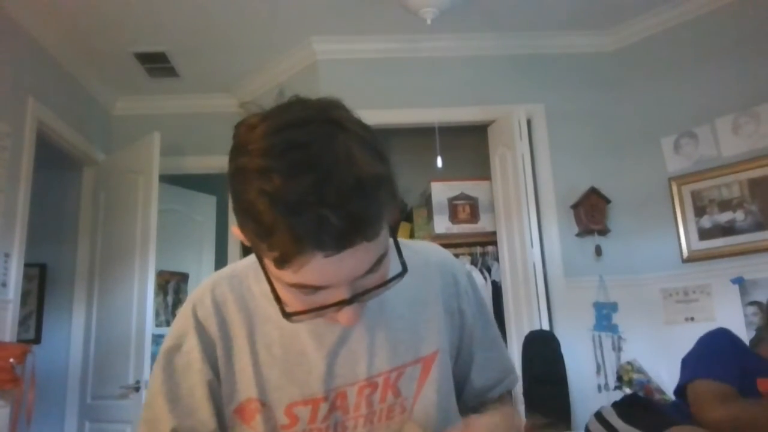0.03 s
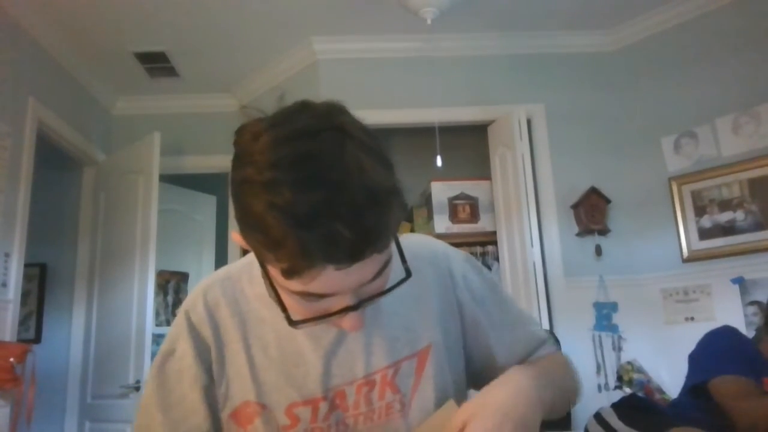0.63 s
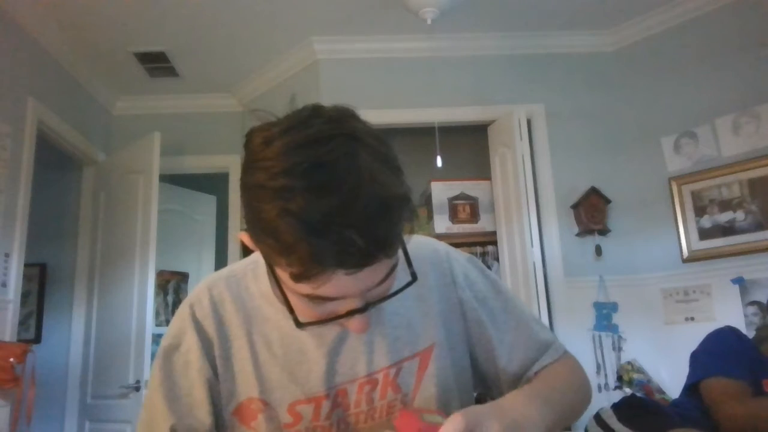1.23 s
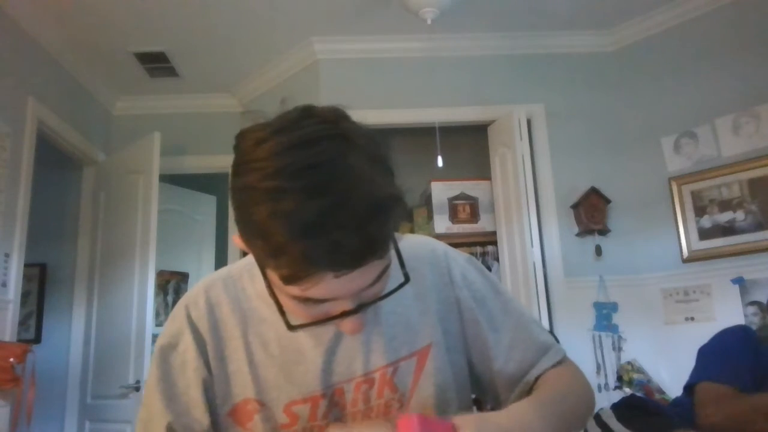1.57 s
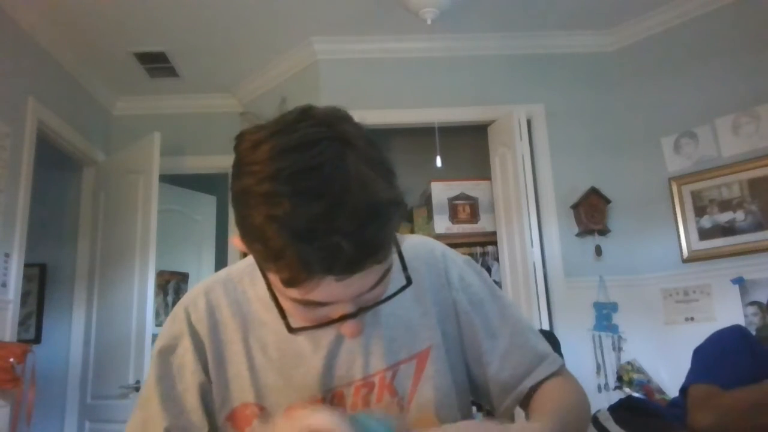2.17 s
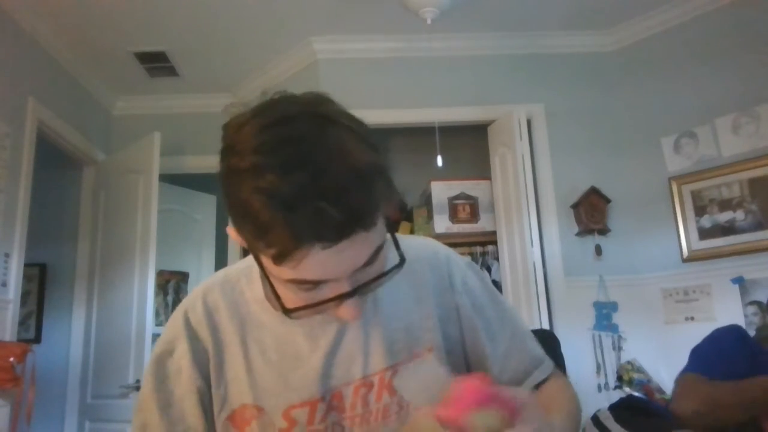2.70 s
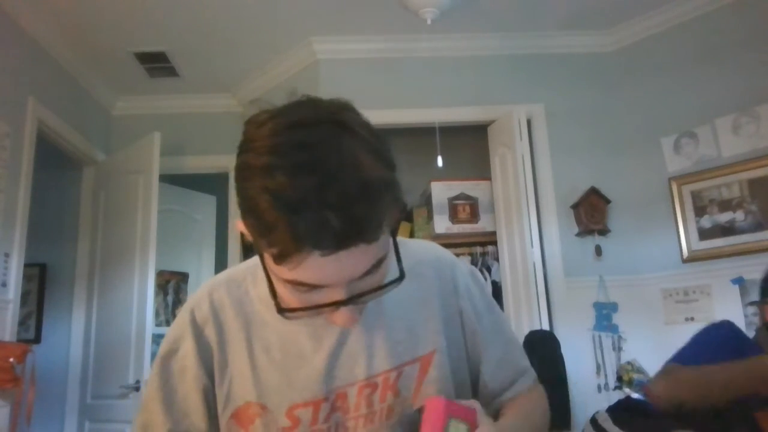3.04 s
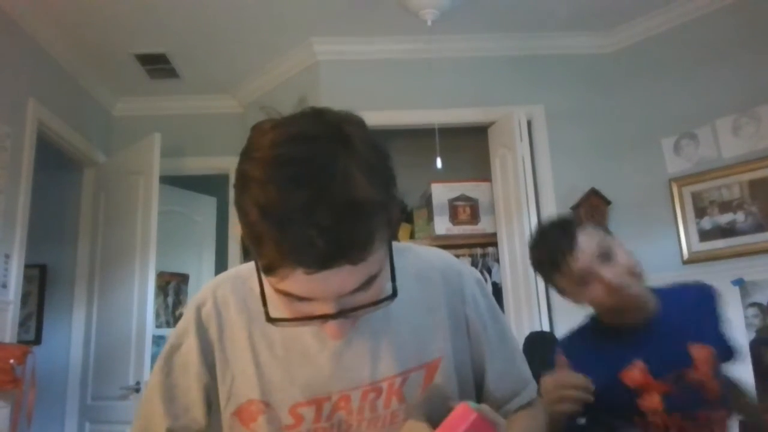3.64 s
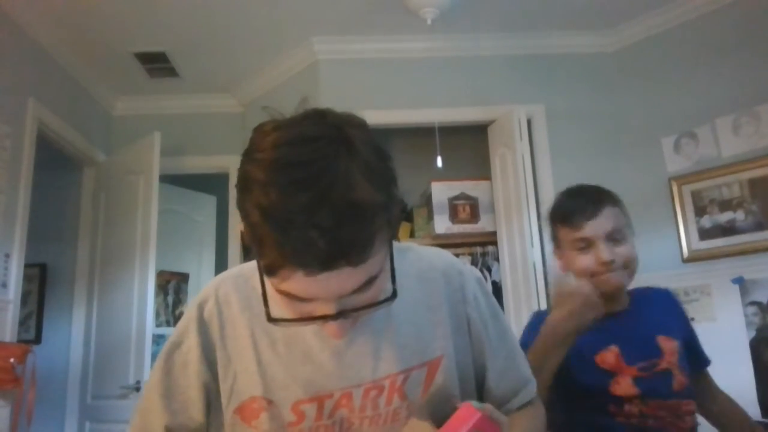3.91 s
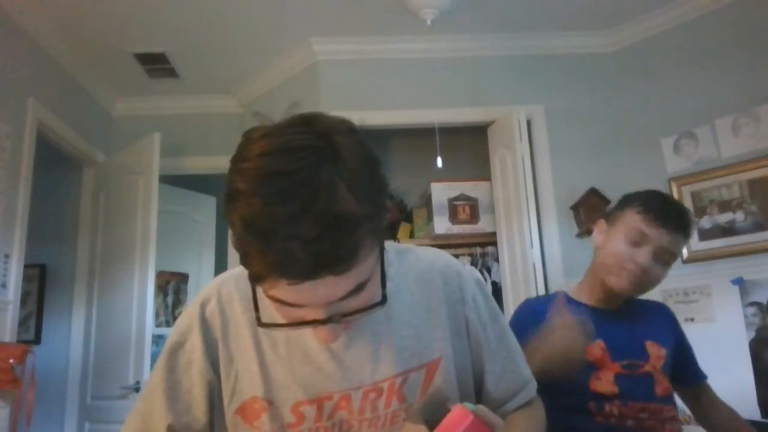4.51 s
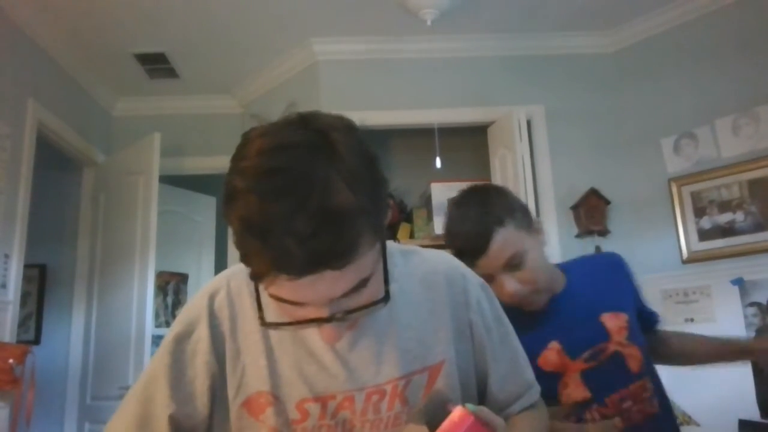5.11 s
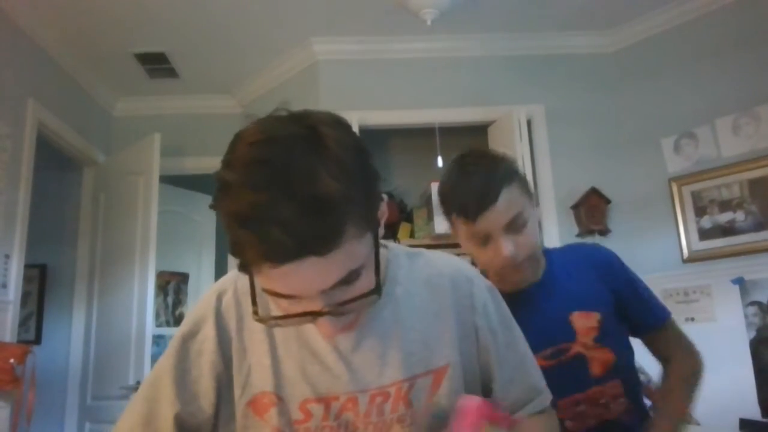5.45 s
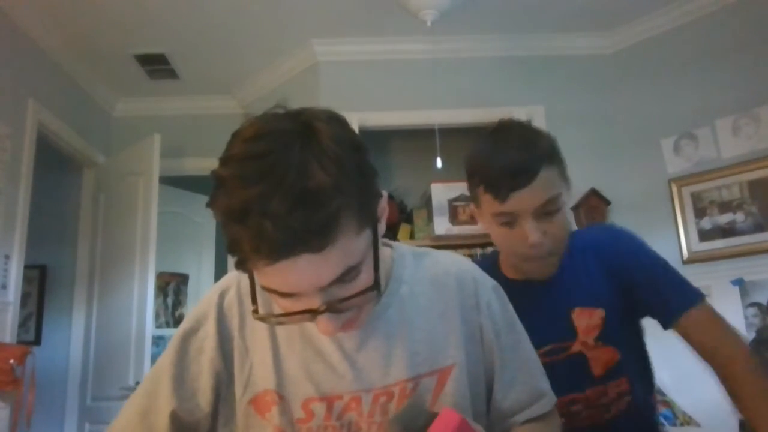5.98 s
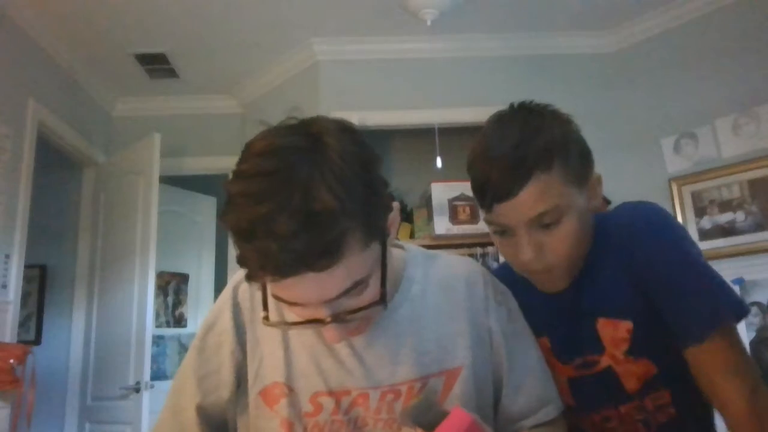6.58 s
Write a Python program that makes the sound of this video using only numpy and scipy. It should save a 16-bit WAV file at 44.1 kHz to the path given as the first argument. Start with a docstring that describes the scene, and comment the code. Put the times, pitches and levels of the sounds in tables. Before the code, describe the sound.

Small plastic figures are shaken out of their packaging and handled on a table. Sharp, uneven clicks and rattles mix with soft hollow thumps from the box and table, brief crackly scrapes and light finger rubbing. The loudest clatter comes about two seconds in, and near the end a toy drags with a faint high ring. The microphone is close, in a quiet small bedroom.

```python
"""Plastic toy figures on a table

Small figures are shaken from their packaging and handled near a laptop microphone. Their hard
plastic clicks and rattles, the box and table thump, and the packaging sticks and slips under the
fingers, scraping and crackling. Near the end a toy is dragged lightly and sings.
The table and a small bedroom throw the sounds back."""
import sys
import numpy as np
from scipy import signal
from scipy.fft import rfft, irfft
from scipy.io import wavfile
from scipy.ndimage import uniform_filter1d

SR = 44100
rng = np.random.default_rng(int(sys.argv[2]) if len(sys.argv) > 2 else 0)


def pcm_store(signal):
    """Save signal as 16-bit PCM."""
    levels = np.round(np.clip(np.atleast_2d(signal), -1, 1) * 32767)
    wavfile.write(sys.argv[1], SR, levels.astype(np.int16).T)


N = 302526


def gain_of(db):
    """Turns decibels into a number to multiply by."""
    return 10 ** (np.asarray(db) / 20)


def unit_rms(x):
    """Scales a sound to an average power of 1."""
    return x / np.sqrt(np.mean(x ** 2) + 1e-20)


def unit_energy(x):
    """Scales a sound to a total energy of 1."""
    return x / (np.linalg.norm(x) + 1e-12)


def curve_at(points, hz):
    """Reads between the rows of a (frequency, value) table."""
    known_hz, value = np.transpose(points)
    return np.interp(np.log(hz + 1), np.log(known_hz), value)


def add(mix, start_s, sound):
    """Lays a sound into the mix."""
    part = mix[max(round(start_s * SR), 0):][:len(sound)]
    part += sound[:len(part)]


def band(x, low_hz, high_hz, order=3):
    """Keeps what lies between two frequencies."""
    return signal.sosfilt(signal.butter(order, [low_hz, high_hz], "band", fs=SR, output="sos"), x)


def resonate(x, hz, q):
    """Rings at one pitch; a higher q rings longer."""
    return signal.lfilter(*signal.iirpeak(hz, q, fs=SR), x)


def slips(count, per_s, spread_db, smooth):
    """Surfaces stick and slip: clicks of uneven size over smooth friction."""
    at = np.flatnonzero(rng.random(count) < per_s / SR)
    sizes = gain_of(spread_db * np.minimum(rng.exponential(1, len(at)), 4))
    clicks = np.zeros(count)
    clicks[at] = sizes * rng.choice([-1, 1], len(at))
    return unit_rms(unit_rms(clicks) + smooth * rng.standard_normal(count))


def grip_wobble(count, step_s, depth_db):
    """Loudness wanders as the grip shifts."""
    t = np.arange(count) / SR
    steps = rng.standard_normal(512)
    return gain_of(depth_db * np.interp(t / step_s, np.arange(len(steps)), steps))


# The tone of the hush. Each row: frequency in Hz, relative level in dB.
HUSH_TONE = [(60, -42), (100, -4.5), (240, 1), (600, -7.5), (7500, -21)]


def hush():
    """The quiet, steady noise of the room."""
    tone = gain_of(curve_at(HUSH_TONE, np.fft.rfftfreq(N, 1 / SR)))
    return gain_of(-70.5) * unit_rms(irfft(rfft(rng.standard_normal(N)) * tone, N))


# The low, middle and high bands of friction. Each row: bottom in Hz, top in Hz.
FRICTION_BANDS = [(190, 1142), (900, 3254), (3000, 7600)]
# The balance of the rubbing: low, middle and high band in dB.
RUB_BALANCE = (-1, -2, -6)
# How the rubbing rises and falls. Each row: time in seconds, relative bass and treble levels in dB.
RUBBING = [(0.0, -62.5, -59.5), (.34, -57.5, -61.5), (.59, -55, -57), (.95, -58, -54), (1.26, -68, -67),
           (1.99, -59, -59), (2.35, -67.5, -63.5), (2.56, -75.5, -68), (2.791, -61, -71), (3.0, -50.5, -64),
           (3.34, -59, -70.5), (3.551, -56.5, -64.5), (3.9, -51, -56), (4.282, -65.5, -72.5),
           (5.049, -60, -66.5), (5.249, -50, -78), (5.35, -58, -67), (5.66, -63, -63), (5.71, -68, -69.5),
           (6.2, -53.5, -59), (6.31, -53, -65.5), (6.38, -56.5, -59.5), (6.86, -59.5, -62)]


def rubbing():
    """Fingers rub softly all the time; resonances come and go as the grip shifts."""
    times, bass_db, treble_db = np.transpose(RUBBING)
    t = np.arange(N) / SR
    bass, treble = gain_of(np.interp(t, times, bass_db)), gain_of(np.interp(t, times, treble_db))
    middle = np.sqrt(bass * treble)
    spectrum = signal.stft(slips(N, per_s=420, spread_db=2.9, smooth=.95), nperseg=512)[2]
    # random loud and soft patches, blurred over pitch and then over time
    patches = uniform_filter1d(rng.standard_normal(spectrum.shape), size=5, axis=0)
    patches = uniform_filter1d(patches, size=6, axis=1)
    rub = signal.istft(spectrum * gain_of(5.2 * unit_rms(patches)))[1][:N]
    out = np.zeros(N)
    for (low, high), band_db, level in zip(FRICTION_BANDS, RUB_BALANCE, (bass, middle, treble)):
        out += gain_of(band_db) * level * unit_rms(band(rub, low, high))
    return out * grip_wobble(N, step_s=.02, depth_db=3.2)


LEAD_S = .02  # time left for a faint, brief swell of noise just before each hit
FIRM_DB = -30.5  # blows weaker than this have a fainter swell
BLOW_SCALE = np.sqrt(.005 * SR)  # a blow's strength counts as if its energy were spread over 5 ms


def contact(t, db, chatter, chatter_s, rattle_db):
    """A faint noise swells briefly, then a toy lands at t = 0, chatters and rattles to rest."""
    before, after = np.minimum(t, 0), np.maximum(t, 0)
    swell = slips(len(t), per_s=3000, spread_db=1, smooth=.95) * np.exp(before / .0046) * (t < 0)
    swell_db = -12 + .58 * min(db - FIRM_DB, 0)
    settle = rng.standard_normal(len(t)) * np.exp(-after / chatter_s) * (t >= 0)
    rattle = slips(len(t), per_s=900, spread_db=2, smooth=.5) * np.exp(-after / .01) * (t > .003)
    # uneven faces meet at several points within about a millisecond
    touch = 4.2 * unit_energy(rng.standard_normal(len(t)) * np.exp(-after / .0011) * (t >= 0))
    touch[np.searchsorted(t, 0)] += .5
    return (unit_energy(touch) + chatter * unit_energy(settle)
            + gain_of(swell_db) * unit_energy(swell) + gain_of(rattle_db) * unit_energy(rattle))


def flatten(x, width_hz):
    """Evens out lows and highs so a contact stirs every pitch; the fine ripple stays."""
    spectrum = rfft(x)
    power = uniform_filter1d(abs(spectrum) ** 2, max(round(width_hz * len(x) / SR), 1))
    return unit_energy(irfft(spectrum / np.sqrt(abs(power) + 1e-12), len(x)))


# The extra pitches of a plastic wall, as multiples of its main pitch.
WALL_RATIOS = (0.718, 0.868, 1.194, 1.421)


def wall_ring(push, hz, q, ring_q, ring_gain):
    """A struck wall gives a dull note and a longer ring; the spot hit sets the mix of extra pitches."""
    broad = resonate(push, hz, q)
    note = unit_energy(unit_energy(broad) + unit_energy(resonate(broad, hz, q)))
    ring = unit_energy(resonate(push, hz, ring_q))
    extras = sum(rng.standard_normal() * resonate(push, hz * ratio, q=20) for ratio in WALL_RATIOS)
    return note + ring_gain * ring + .8 * unit_energy(extras)


# Parts of the toys and packaging. Each entry: shell pitch in Hz, edge pitch in Hz, thud level in dB.
PLASTIC_PARTS = {"box": (970, 3150, -6), "cap": (1080, 3000, -20), "lid": (1100, 6400, -12.5),
                 "tray": (1330, 6100, -10), "base": (1380, 4420, -21), "chest": (1560, 3000, -24),
                 "body": (1770, 3300, -10), "head": (1750, 5760, -16), "leg": (2150, 4440, -20),
                 "hand": (2100, 6900, -27), "foot": (2450, 5750, -27), "arm": (2750, 2900, -30),
                 "peg": (2800, 6700, -28)}
# Plastic hitting plastic; one row (4.492 s) is instead a strong echo of the hit just before it, # thrown back
# by the room. Each row: time in seconds, part, relative strength in dB, # hardness in dB (how much louder the
# edge is than the shell).
CLICKS = [(.017, "head", -28.5, -13), (0.03, "base", -37, -1), (0.0445, "base", -19.5, 8.5),
          (0.219, "body", -27.5, -21), (.281, "hand", -31.5, -5.5), (.396, "hand", -33, -8),
          (0.449, "lid", -27, 4), (0.481, "leg", -31, -2), (0.5142, "base", -19, -8),
          (0.5196, "body", -13.5, 1.5), (0.639, "peg", -26, 8), (0.6936, "peg", -29, 4.5),
          (0.761, "leg", -25.5, 5), (0.8, "arm", -36, -8), (.817, "head", -28.5, 19),
          (0.923, "body", -34, -7.5), (.963, "body", -34.5, -17), (1.0208, "head", -21.5, 1.5),
          (1.047, "leg", -24, -3), (1.055, "hand", -19.5, -5.5), (1.088, "cap", -41.5, 13),
          (1.122, "arm", -41, 2), (1.235, "tray", -33, 2.5), (1.27, "arm", -42, 1),
          (1.371, "hand", -35.5, 17.5), (1.421, "leg", -32.5, 6), (1.447, "peg", -39.5, -1),
          (1.4665, "peg", -25, 5.5), (1.527, "arm", -29.5, -19), (1.551, "lid", -44.5, -8),
          (1.614, "cap", -41, -6), (1.64, "body", -48.5, -12), (1.668, "head", -20, 2),
          (1.748, "peg", -41, -4), (1.7753, "hand", -20.5, 2.5), (1.8253, "leg", -24, 10.5),
          (1.883, "leg", -41, -27), (1.948, "leg", -12.5, 24), (2.015, "base", -31.5, -4),
          (2.03, "head", -23.5, 4), (2.079, "hand", -38.5, -3), (2.192, "body", -23, -13),
          (2.2016, "body", -17, -0.5), (2.2167, "tray", -10.5, 12), (2.338, "head", -38.5, -2.5),
          (2.4217, "base", -29.5, 3.5), (2.4259, "base", -26.5, 1), (2.468, "base", -42, -1.5),
          (2.495, "leg", -26.5, -4.5), (2.68, "hand", -51.5, -1), (2.792, "chest", -28, 3),
          (2.8284, "leg", -18.5, 3.5), (2.841, "base", -33, -6), (2.939, "hand", -34, -17),
          (2.973, "head", -29.5, -8), (2.9783, "base", -26, -28), (3.0282, "chest", -26, -9),
          (3.093, "body", -33, -33.5), (3.131, "body", -34, -31), (3.177, "base", -42.5, -20),
          (3.256, "base", -44, -16), (3.3304, "hand", -33, -5), (3.367, "base", -35.5, 1),
          (3.462, "cap", -48, -4), (3.512, "cap", -34, -8.5), (3.557, "arm", -42.5, -9),
          (3.629, "hand", -42.5, 4), (3.7216, "base", -33.5, -26), (3.764, "arm", -39.5, 3),
          (3.797, "hand", -21.5, 1), (3.8199, "body", -25.5, 2), (3.8249, "chest", -18.5, -4),
          (3.882, "foot", -43, 1), (3.93, "foot", -34, 4), (3.956, "foot", -33, 10),
          (4.007, "hand", -46, 3), (4.067, "hand", -53.5, 4), (4.128, "lid", -44, -1),
          (4.1979, "hand", -27, 1.5), (4.262, "base", -44.5, 2.5), (4.4171, "foot", -14.5, 23),
          (4.4807, "head", -19, 2), (4.492, "base", -34.5, -14), (4.7771, "foot", -30, 25.5),
          (4.827, "head", -41, -1.5), (4.8618, "box", -35.5, -16), (4.913, "hand", -51.5, 11),
          (5.008, "lid", -44, -9), (5.119, "lid", -38.5, 10), (5.175, "hand", -31.5, 2.5),
          (5.198, "arm", -27.5, -17), (5.21, "box", -25.5, 6), (5.2136, "peg", -21, 6.5),
          (5.226, "leg", -28, 4), (5.253, "box", -29.5, 12.5), (5.275, "arm", -35, 3),
          (5.391, "leg", -26, 28), (5.401, "leg", -41, 12), (5.4105, "head", -26, 21),
          (5.5579, "lid", -29, 22), (5.573, "body", -33, -6), (5.604, "foot", -24.5, 3.5),
          (5.64, "leg", -45.5, 5), (5.719, "foot", -40.5, 13.5), (5.7495, "peg", -26.5, 4.5),
          (5.756, "foot", -18, 20.5), (5.8242, "chest", -30.5, -1.5), (5.83, "head", -31, 9),
          (5.839, "hand", -28.5, 1.5), (5.895, "foot", -32, 9), (5.9061, "foot", -22.5, 13),
          (6.0865, "box", -27, -40), (6.2272, "chest", -31.5, 0.5), (6.267, "base", -43, -13),
          (6.3454, "lid", -30.5, -2.5), (6.366, "arm", -35.5, 2.5), (6.4884, "hand", -34.5, 19),
          (6.54, "arm", -43, -4), (6.618, "arm", -39, 12), (6.6304, "box", -24, 12.5),
          (6.69, "cap", -44.5, -17), (6.712, "foot", -18.5, 29), (6.845, "cap", -47.5, -9)]


def clicks():
    """Each blow rings the hollow shell and hard edge of a part; heavy parts also thud."""
    out = np.zeros(N)
    t = np.arange(-LEAD_S, .1, 1 / SR)
    for time_s, part, db, hard_db in CLICKS:
        shell_hz, edge_hz, thud_db = PLASTIC_PARTS[part]
        # hard blows chatter and rattle more; light ones skid instead of snapping
        chatter = gain_of(-6.5 + .22 * max(hard_db, 0) + .5 * (FIRM_DB - db))
        push = contact(t, db, chatter, chatter_s=.0029, rattle_db=-19 + .26 * hard_db)
        push = flatten(push, width_hz=3000)
        # the pitches shift with the spot that is hit
        shell_shift, edge_shift = 1 + np.array([.031, .095]) * rng.uniform(-.85, 1, 2)
        shell = wall_ring(push, shell_hz * shell_shift, q=1.95, ring_q=18, ring_gain=.25)
        shell = unit_energy(band(shell, 1120, 3340))
        edge = wall_ring(push, edge_hz * edge_shift, q=.5, ring_q=4, ring_gain=1.1)
        edge = unit_energy(band(edge, 2770, 8400))
        thud = unit_energy(band(push, 350, 1200, order=2))
        blow = unit_energy(gain_of(hard_db) * edge - shell + gain_of(thud_db) * thud)
        add(out, time_s - LEAD_S, gain_of(db) * BLOW_SCALE * blow)
    return out


# What the packaging slides on. Each entry: levels of the low, middle and high band in dB.
SURFACE_TONES = {"film": (-19, -1.9, 0), "card": (-8.5, 0, -18.5), "table": (-0.11, -1.2, 0),
                 "skin": (0, -3.5, -18.5)}
# Short slides. Each row: time of the peak in seconds, surface, length in seconds, relative level in dB.
SLIDES = [(0.023, "film", 0.039, -35.5), (0.059, "table", 0.032, -44), (0.401, "table", 0.032, -42),
          (0.461, "film", 0.037, -28.5), (0.791, "card", 0.099, -40.5), (0.932, "card", 0.074, -45.5),
          (1.018, "film", 0.028, -30), (1.058, "film", 0.038, -32.5), (1.152, "card", 0.033, -45.5),
          (1.284, "card", 0.038, -51.5), (1.431, "film", 0.021, -45.5), (1.559, "skin", 0.041, -50.5),
          (2.16, "card", 0.062, -33.5), (2.197, "card", 0.066, -25.5), (2.499, "table", 0.052, -38.5),
          (2.948, "table", 0.065, -55), (3.148, "card", 0.089, -51.5), (3.368, "table", 0.033, -43.5),
          (3.5, "table", 0.071, -55.5), (3.584, "table", 0.083, -60.5), (3.737, "table", 0.047, -52),
          (3.806, "film", 0.026, -32), (3.991, "film", 0.046, -51.5), (4.131, "table", 0.038, -48),
          (4.279, "skin", 0.026, -37.5), (4.423, "table", 0.039, -41.5), (4.455, "film", 0.061, -55),
          (4.673, "card", 0.023, -49.5), (4.788, "film", 0.021, -52.5), (4.872, "skin", 0.053, -41.5),
          (5.134, "table", 0.055, -45), (5.219, "table", .04, -36.5), (5.258, "table", 0.053, -43.5),
          (5.415, "film", 0.038, -49.5), (5.769, "film", 0.068, -56), (5.807, "table", 0.12, -45.5),
          (5.92, "table", 0.047, -45), (6.15, "table", 0.075, -54.5), (6.366, "table", 0.046, -43),
          (6.485, "film", 0.032, -50), (6.618, "card", 0.045, -42), (6.723, "film", 0.039, -51.5)]


def scrapes():
    """Slips swell and fade as the packaging slides, flexing it at new pitches each time."""
    out = np.zeros(N)
    for peak_s, surface, length_s, db in SLIDES:
        rise_s, fall_s = .51 * length_s, .49 * length_s
        t = np.arange(-rise_s, fall_s, 1 / SR)
        from_peak = abs(np.where(t < 0, t / rise_s, t / fall_s))
        swell = gain_of(db - 14 * from_peak ** 2.9)
        for (low, high), band_db in zip(FRICTION_BANDS, SURFACE_TONES[surface]):
            # a quick slide blurs into a swish, a slow one breaks into separate slips
            friction = slips(len(t), per_s=70 / length_s, spread_db=2.5, smooth=.31)
            rub = band(friction, low, high) * grip_wobble(len(t), step_s=.007, depth_db=5)
            flex_hz = low * (high / low) ** rng.uniform(.15, .98, 3)
            flex = sum(resonate(rub, hz, q=29) for hz in flex_hz)
            scrape = unit_rms(unit_rms(rub) + 1.6 * unit_rms(flex))
            add(out, peak_s - rise_s, gain_of(band_db) * swell * scrape)
    return out


# Bumps on the box and table. Each row: time in seconds, pitch in Hz, relative strength in dB.
BUMPS = [(.061, 356, -31), (0.2198, 450, -26), (0.2427, 288, -27), (.307, 203, -39.5), (0.395, 272, -38.5),
         (0.451, 844, -29), (0.5144, 590, -23), (.5192, 712, -13), (0.53, 209.4, -35.5), (0.644, 463, -42),
         (.757, 870, -29.5), (0.76, 310, -33), (.924, 357, -38.5), (1.054, 600, -24.5), (1.087, 538, -33.5),
         (1.772, 452, -38), (2.493, 485, -35.5), (2.795, 332, -29.5), (2.828, 1060, -20), (2.938, 392, -33),
         (2.977, 737, -30.5), (2.98, 278, -31), (3.024, 349, -21), (3.132, 195, -34), (3.176, 440, -35),
         (3.212, 197, -37.5), (3.449, 288, -37), (3.464, 1100, -28.5), (3.513, 1026, -28),
         (3.709, 357, -36.5), (3.723, 530, -34.5), (3.817, 715, -19.5), (3.825, 315, -27),
         (3.828, 207, -30), (4.143, 290, -36.5), (4.273, 343, -29.5), (4.279, 195.7, -35.5),
         (4.414, 285, -38.5), (4.481, 931, -22.5), (5.236, 484, -36.5), (5.609, 326, -32),
         (5.75, 978, -30.5), (5.823, 910, -19), (5.837, 1000, -30), (6.087, 809, -26), (6.089, 507, -28.5),
         (6.231, 465, -32.5), (6.267, 330, -27), (6.275, 606, -31), (6.346, 702, -37.5)]


def thumps():
    """Softer, heavier blows ring one hollow note of the box or table over a dull thud."""
    out = np.zeros(N)
    t = np.arange(-LEAD_S, .16, 1 / SR)
    for time_s, hz, db in BUMPS:
        push = flatten(contact(t, db, chatter=.65, chatter_s=.006, rattle_db=-12), width_hz=600)
        thud = band(push, .56 * hz, 1.86 * hz, order=2)
        note = resonate(thud, hz, q=8)
        bump = unit_energy(unit_energy(note) + .45 * unit_energy(thud))
        add(out, time_s - LEAD_S, gain_of(db) * BLOW_SCALE * bump)
    return out


# How the drag swells and fades. Each row: time in seconds, level in dB.
DRAG_LEVELS = [(6.0, -70), (6.141, -62), (6.28, -65.5), (6.33, -93)]
# The notes of the dragged toy. Each row: pitch in Hz, relative level in dB.
DRAG_NOTES = [(5030, 5.4), (5380, 8.1), (5960, 3), (6800, 4.4)]


def drag():
    """Light, even friction on smooth plastic keeps a few high notes of a toy singing."""
    times, levels_db = np.transpose(DRAG_LEVELS)
    swell = np.interp(np.arange(N) / SR, times, gain_of(levels_db), left=0, right=0)
    friction = rng.standard_normal(N)
    song = sum(gain_of(db) * resonate(friction, hz, q=96) for hz, db in DRAG_NOTES)
    return unit_rms(song) * swell


# The notes of the figures. Each row: pitch in Hz, relative level in dB, seconds to fade by 60 dB.
TOY_NOTES = [(785, -7, .06), (1491, -8, .07), (1775, 0, .07), (2030, 1, .07), (2250, 0, .07),
             (3470, 8, .044), (5740, 8, .035), (7037, 22, .01)]


def toy_ring(touches):
    """The figures ring on for a moment after each touch."""
    t = np.arange(SR // 8) / SR
    ring = sum(gain_of(db - 60 * t / fade_s) * np.sin(2 * np.pi * hz * t) for hz, db, fade_s in TOY_NOTES)
    return signal.fftconvolve(touches, unit_energy(ring))[:N]


# Echoes off the table, screen and nearest walls. Each row: delay in seconds, level in dB.
NEAR_ECHOES = [(.003, -16.5), (.0102, -14.5), (0.0165, -19.5), (0.024, -28), (0.033, -28.5)]
# How long the room rings. Each row: frequency in Hz, seconds to fade by 60 dB.
ROOM_FADE = [(200, 0.27), (1500, 0.32), (7000, 0.17)]


def room(x, scatter_db, scatter_s, tail_db):
    """The bedroom adds smeared echoes, scatter from nearby clutter and a short fading tail."""
    count = SR // 2
    t = np.arange(count) / SR
    hz, times, spectrum = signal.stft(rng.standard_normal(count), SR, nperseg=256)
    fade = gain_of(-60 * times / curve_at(ROOM_FADE, hz)[:, None])
    tail = signal.istft(spectrum * fade, SR, nperseg=256)[1][:count] * np.clip(t / .012, 0, 1)
    scatter = rng.standard_normal(count) * (rng.random(count) < 2000 / SR)
    scatter *= np.exp(-t / scatter_s) * (t > .002)
    response = gain_of(tail_db) * unit_energy(tail) + gain_of(scatter_db) * unit_energy(scatter)
    response[0] += 1  # the direct sound
    for delay_s, db in NEAR_ECHOES:
        smear = rng.standard_normal(count) * np.exp(-t / .0024)
        add(response, delay_s, gain_of(db) * unit_energy(smear))
    return signal.fftconvolve(x, response)[:N]


def scene():
    """All the sounds of the toys, heard in the room over its hush."""
    toys = gain_of(-2) * clicks() + gain_of(-4.5) * thumps() + gain_of(-1.24) * scrapes()
    toys += rubbing() + drag()
    toys += gain_of(-17.5) * toy_ring(toys)
    return (room(toys, scatter_db=-14, scatter_s=.0054, tail_db=-25) + hush())[None]


# The tone of the microphone. Each row: frequency in Hz, boost or cut in dB.
MIC_TONE = [(60, -10.5), (115, -14), (160, 4), (205, 4.5), (250, 0), (320, 3), (500, 2), (1800, 0.5),
            (2600, -0.5), (7400, -0.5)]


def record(dry):
    """A small microphone overloads on the hardest hits and loses deep bass and high treble."""
    size = 8192
    log_gain = np.log(gain_of(curve_at(MIC_TONE, abs(np.fft.fftfreq(size, 1 / SR)))))
    # a filter with that tone which rings only after a click, never before it
    tone = np.fft.ifft(np.exp(np.conj(signal.hilbert(log_gain)))).real[:size // 2]
    heard = signal.oaconvolve(np.clip(dry, -.7, .7), tone[None])[:, :N]
    treble_cut = signal.firwin(901, cutoff=7640, window=("kaiser", 7), fs=SR)
    return signal.oaconvolve(heard, treble_cut[None], "same")


dry = scene()
out = record(dry)
pcm_store(out)
```